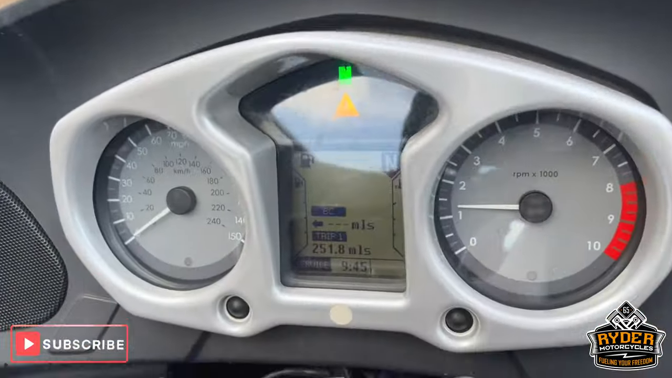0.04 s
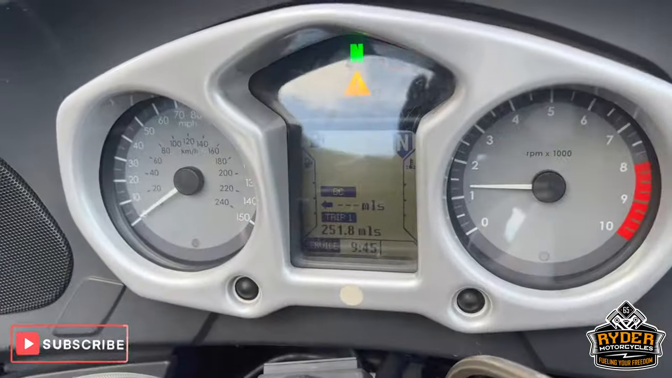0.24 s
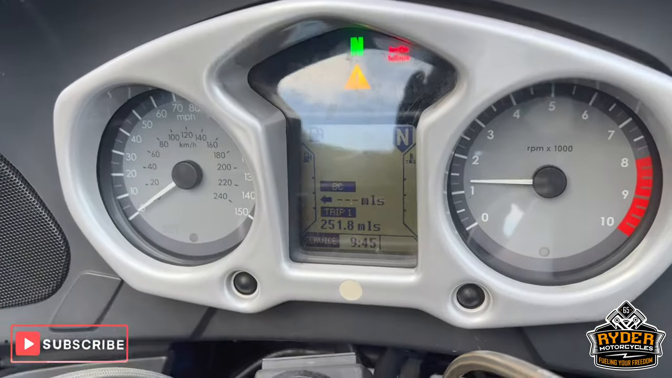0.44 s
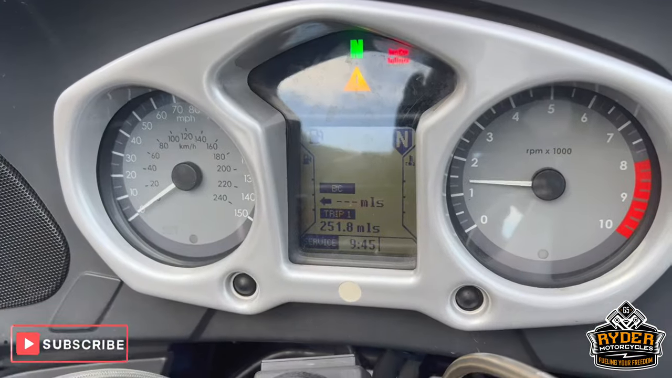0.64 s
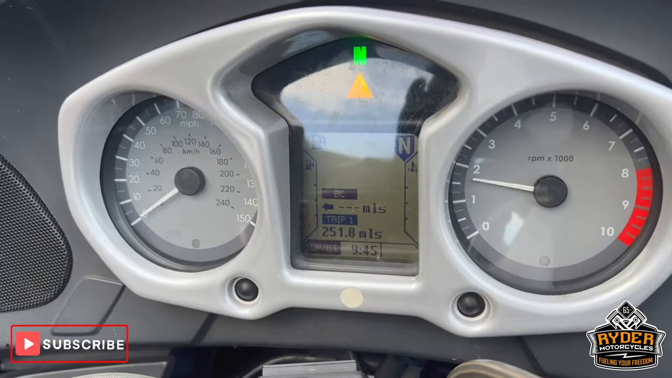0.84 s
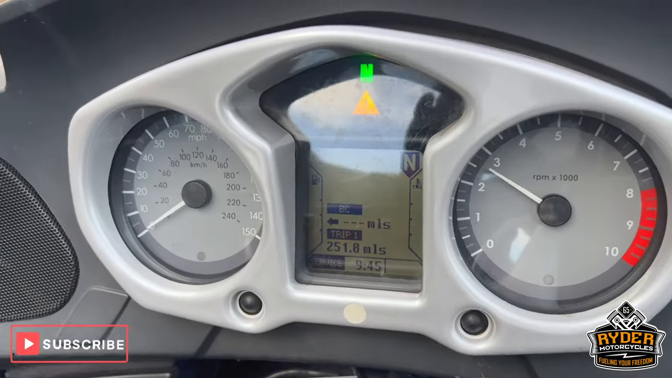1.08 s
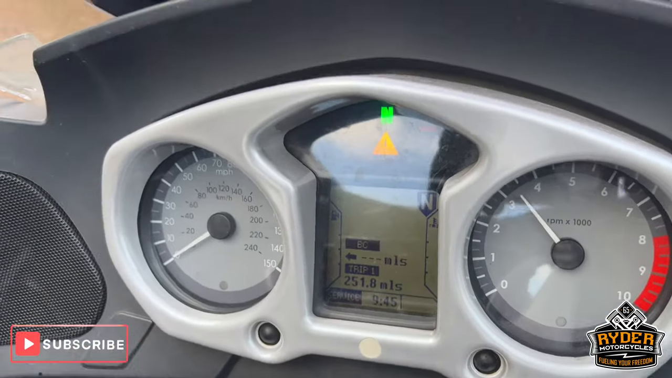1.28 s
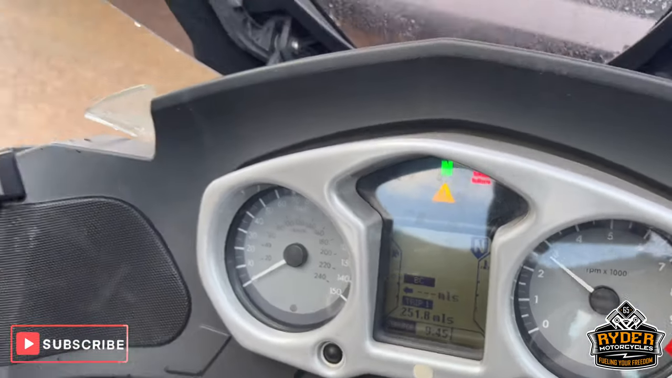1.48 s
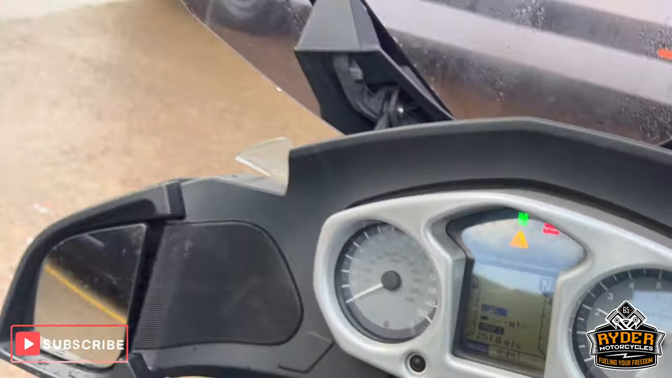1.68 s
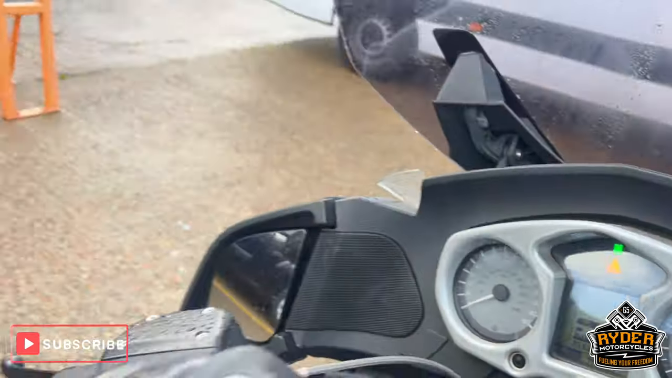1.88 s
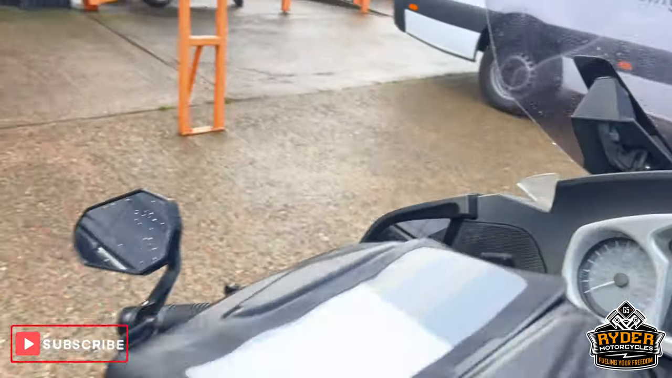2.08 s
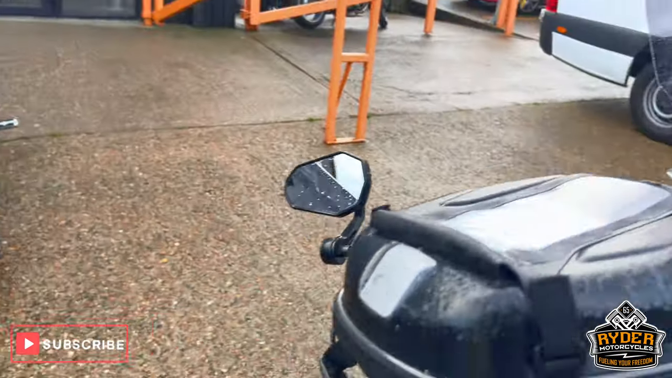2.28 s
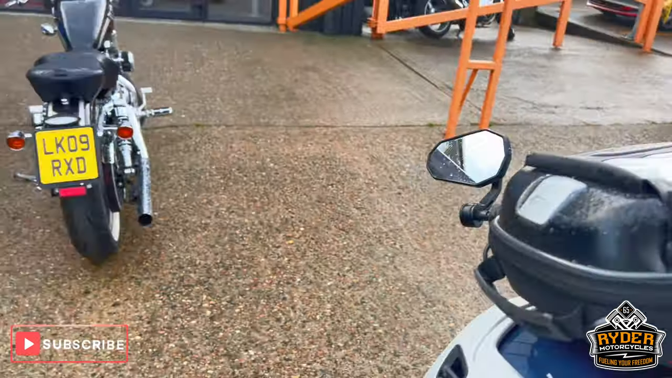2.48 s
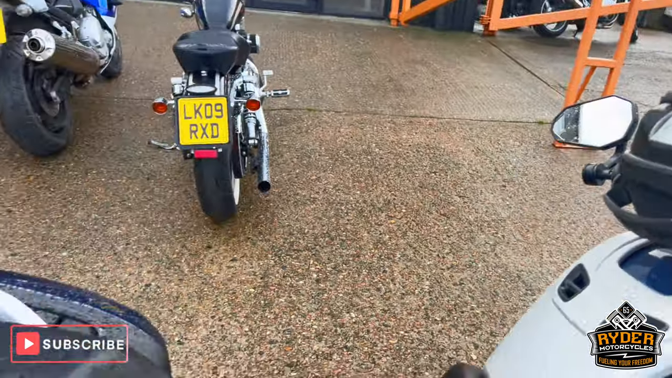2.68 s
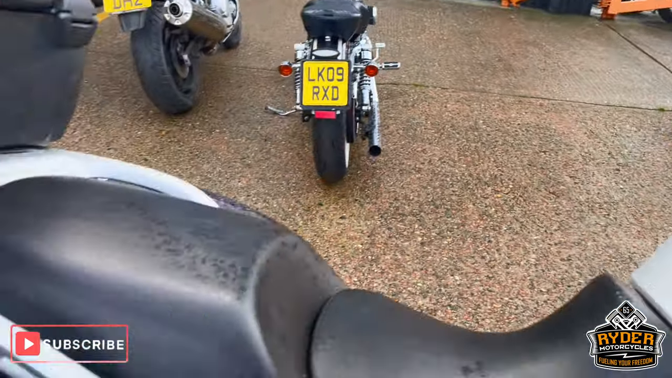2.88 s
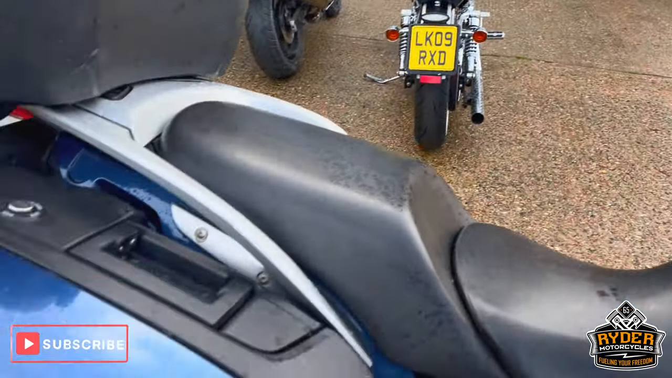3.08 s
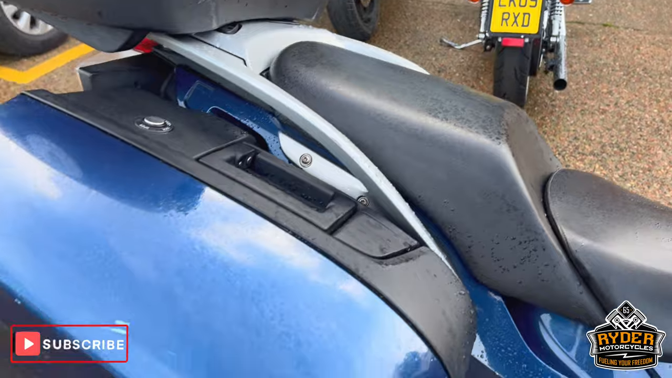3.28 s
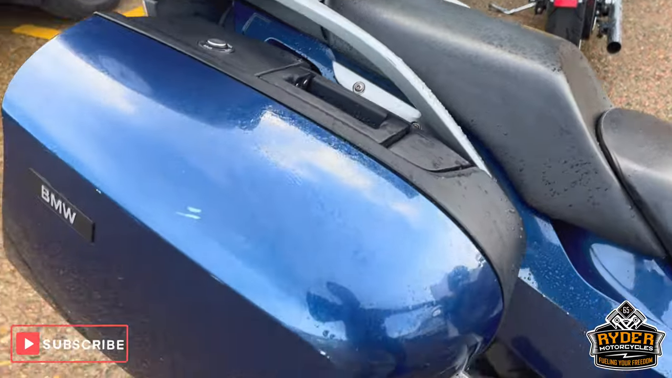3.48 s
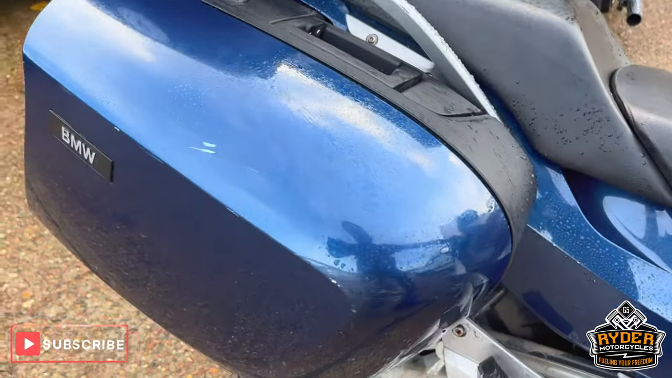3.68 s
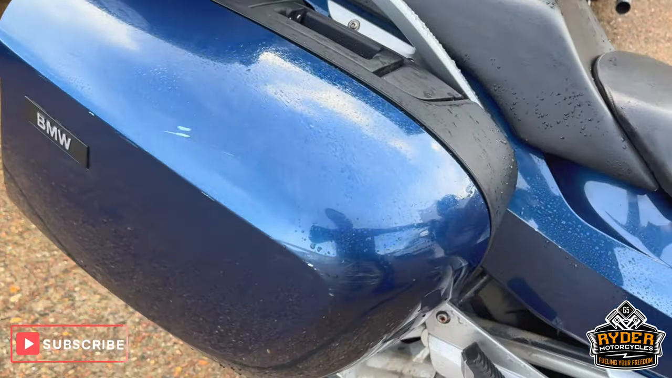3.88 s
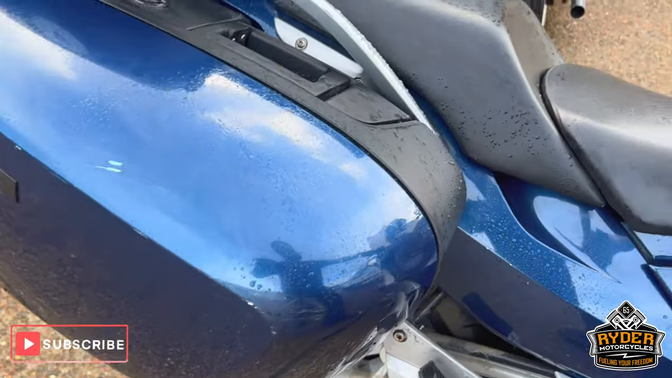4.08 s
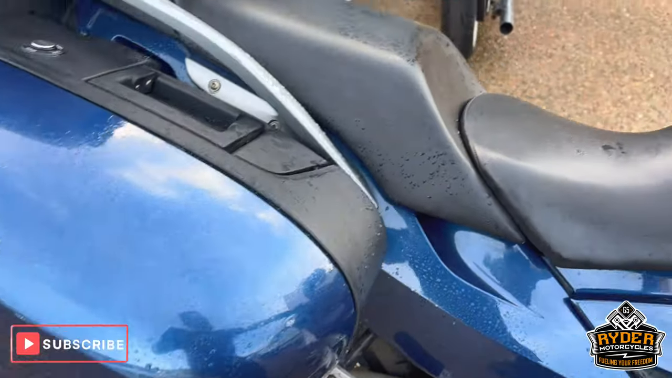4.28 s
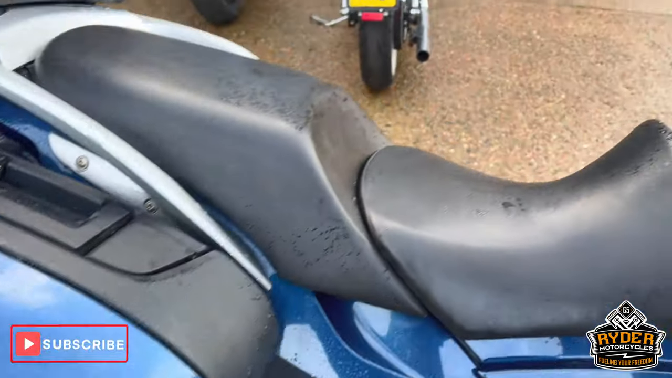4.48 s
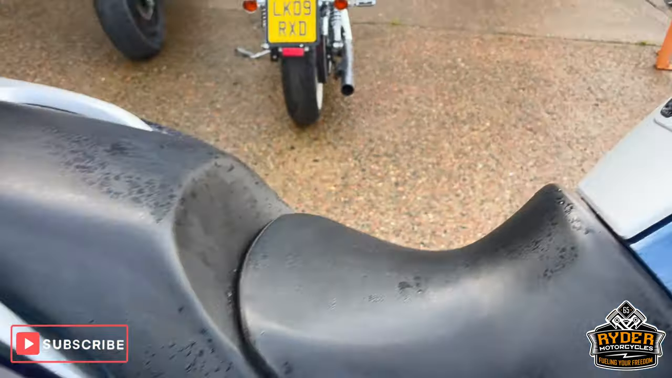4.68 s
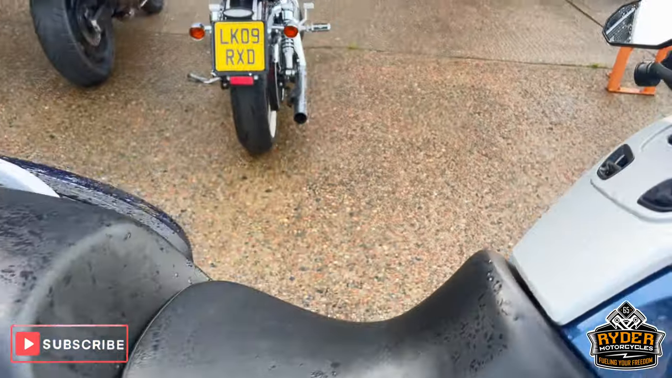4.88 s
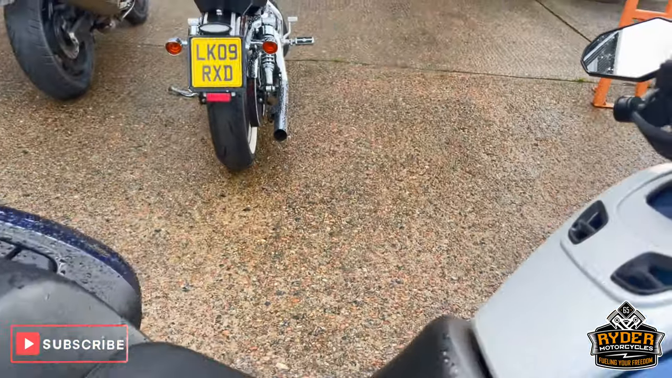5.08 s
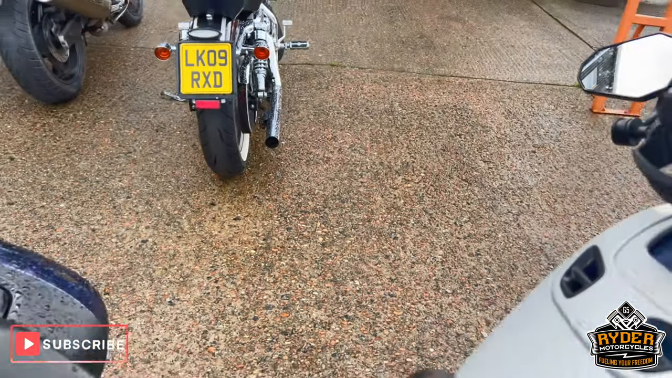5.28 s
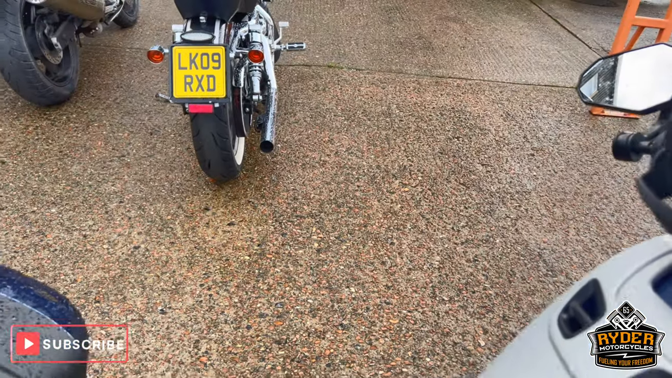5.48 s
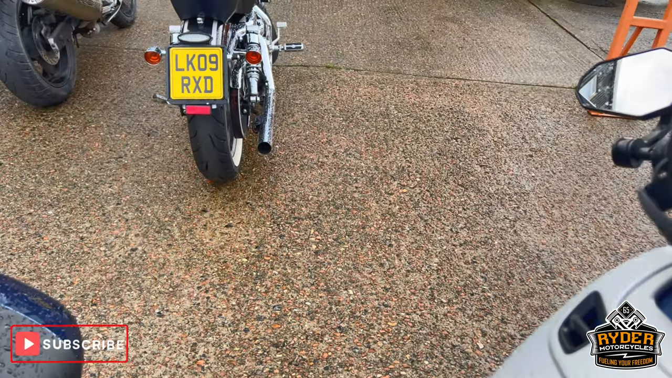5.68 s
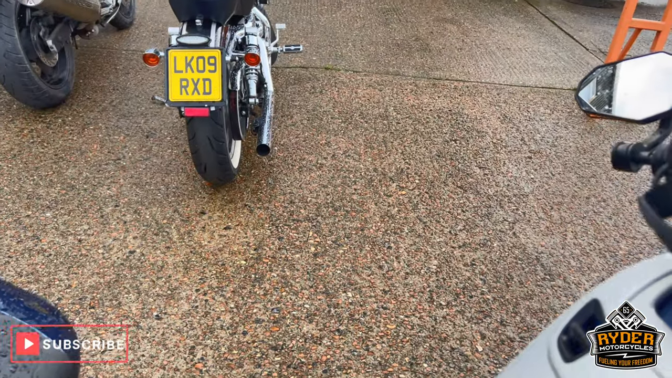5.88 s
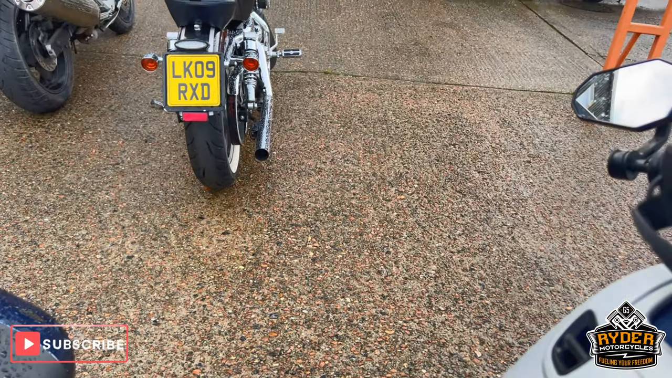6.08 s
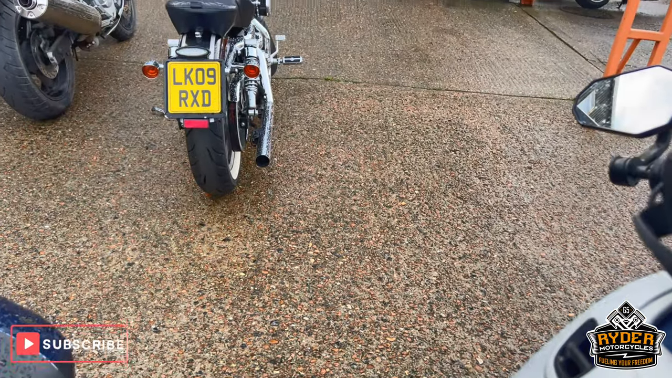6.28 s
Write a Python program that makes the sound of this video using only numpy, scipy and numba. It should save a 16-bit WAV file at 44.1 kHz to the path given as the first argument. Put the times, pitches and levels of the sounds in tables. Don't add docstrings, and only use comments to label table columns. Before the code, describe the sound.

Outdoors on hard ground, a handheld phone stays close to a twin-cylinder motorcycle. Low puttering idle with fine mechanical hiss, a quick throttle blip swelling into a hoarse roar, then a falling whine to idle. Cloth rustles, a pannier latch squeaks faintly, and a second blip climbs higher and throatier before stumbling down. Quiet idle remains over distant hum, with short reflections from parked vehicles.

```python
import sys
import numpy as np
from scipy import signal
from scipy.io import wavfile
from scipy.ndimage import uniform_filter1d
from numba import njit

SR = 44100
rng = np.random.default_rng(int(sys.argv[2]) if len(sys.argv) > 2 else 0)


def digitize_waveform(pressure):
    field = np.atleast_2d(pressure).T
    bounded = np.clip(field, -1, 1)
    quanta = np.round(bounded * 32767).astype(np.int16)
    wavfile.write(sys.argv[1], SR, quanta)


def linear_from_db(decibels):
    return 10 ** (np.asarray(decibels, float) / 20)


N = 279594

# f/Hz, level/dB per Hz
YARD = [(88, -30), (150, 17), (189, -16), (416, -4.5), (505, 21), (1770, 0), (4460, 5), (9090, -105),
        (15000, -72)]
YARD_DB = -60

# start/s, end/s, level/dB
SLEEVE = [
    (1.523, 1.803, -61),
    (1.767, 2.125, -52),
    (2.078, 2.32, -70),
    (2.26, 2.72, -63),
]
# f/Hz, width/Hz, level/dB
SLEEVE_COLOUR = [(4820, 1300, -8), (7370, 3500, -6.5), (10640, 1180, -9.5), (11400, 2500, -10),
                 (12178, 1100, -16), (14200, 3000, -26)]
# t/s, peak level/dB
TICKS = [
    (2.378, -47),
    (6.2442, -55),
]
STROKE_SHAPE = 1.3

# t/s, flank share/0-1, nearness to cylinder head/dB
SWING = [
    (0, 0, -2),
    (1.9, 0.08, 0.2),
    (2.602, 0.63, 1.5),
    (2.85, 0.8, 3),
    (4.6, 1, -0.5),
    (4.9, 0.61, .6),
    (6.34, 0.54, -3.5),
]

# t/s, f/Hz, level/dB, length/s
SQUEAKS = [(2.346, 1900, -67, .022), (2.45, 1900, -64, .02), (2.814, 1830, -61, .013),
           (2.85, 1255, -56, .025), (2.9, 1880, -59, .01), (2.981, 1860, -54, .011), (3.01, 697, -52, .012),
           (3.025, 1260, -58, .04), (3.07, 1870, -64, .012), (3.175, 1260, -52, .013),
           (3.24, 1260, -57, .03), (3.32, 1870, -55, .07), (3.43, 1260, -50, .06), (3.58, 1280, -37, .06),
           (4.523, 1250, -57, .038), (1.75, 4250, -61, .05), (2.78, 5520, -61, .05), (2.86, 5000, -60, .05),
           (3.22, 5600, -60, .11), (4.163, 5050, -42, .02), (4.6, 4800, -60, .12)]
SQUEAK_BLUR_HZ = (90, 320)
# f/Hz, width/Hz, level/dB
SCREEN = [(856, 38, 7), (1124, 56, 10), (1650, 45, -28)]
SCREEN_DB, SCREEN_SETTLE_DB_PER_S, SCREEN_REST_DB = -57, 15, -80.5
# f/Hz, width/Hz, level/dB
PANNIER = [(695.4, 22, 9.5), (1269, 57, 3), (1880, 54, -6.5), (5550, 85, -21)]
PANNIER_DB, PANNIER_DB_PER_HZ, PANNIER_FAR_DB = -58.5, 0.9363, -37
PANNIER_FULL_HZ = 52
# t/s of coming, near, leaving, gone
PANNIER_NEAR_S = [2.5, 2.9, 4.5, 4.8]

# start/s, end/s, start f/Hz, end f/Hz, level/dB
THROTTLE = [
    (.45, 1.0, 1600, 1420, -57),
    (3.19, 3.42, 1150, 880, -52),
]
CAM_TEETH, POLES = 25.0, 63.5
# f/Hz, level/dB
CAM_CASE = [(570, -76), (690, -60), (775, -46), (900, -50), (1020, -39), (1120, -34), (1280, -37),
            (1500, -32)]
# f/Hz, level/dB
POLE_CASE = [(1450, -77), (1560, -62), (1950, -57), (2300, -60), (2600, -70), (4800, -74)]
CAM_PULL_DB, CAM_HIDDEN_DB, CAM_HIDDEN_HZ = -1, -24, 1060
CAM_FLANK_LOW_DB, CAM_FLANK_LOW_HZ = -9, 950
POLE_PULL_DB, POLE_HIDDEN_DB, POLE_HIDDEN_HZ = -3, -20, 1900
POLE_FLANK_DB = 5

# f/Hz, width/Hz, level/dB
VALVE_GEAR = [(3380, 2700, -2), (4100, 800, 4.5), (4650, 1050, 10), (5000, 290, 1.5), (5930, 660, -15),
              (6930, 1750, 3.5), (8910, 1160, 3), (9550, 1800, -2), (11700, 2500, -22), (13900, 3000, -5)]
# f/Hz, width/Hz, level/dB
FLANK_GEAR = [(3650, 5500, -4), (4080, 640, -10.5), (4871, 680, -4), (5420, 340, -7.5), (6020, 2950, 0.5),
              (6840, 810, -8), (8510, 670, -7.5), (9260, 490, -10.5), (11104, 5000, -26),
              (14618, 2500, -38)]
HEAD_TREBLE_HZ, HEAD_TREBLE_DB_PER_HZ = 10500, 0.32

# f/Hz, width/Hz, level/dB
DASH_RASP = [(255.3, 29, -8.5), (301, 62, -2), (331.8, 50.3, 2), (436, 87, -6), (523, 112, -11.5),
             (711, 151, -6.5), (896, 245, -11)]
FLANK_RASP = [(253.6, 66, -11), (317, 51, -7.5), (430.5, 55, 0), (578, 158, -3.5), (670, 114, 0),
              (880, 450, -14)]
DASH_BARK = [(1062, 190, -6), (1390, 330, -2.5), (1970, 350, -7), (2543, 150, -7.5), (3500, 1500, -3.5)]
FLANK_BARK = [(933, 130, -1), (1325, 200, 1.5), (1662, 120, 3.5), (1820, 230, 2), (2230, 600, 0),
              (2880, 150, -11)]
KNOCK_DB, KNOCK_PULL_DB = 21, 4
# start/s, end/s, level/dB
RASP_SWELLS = [
    (0.43, 0.903, 8),
    (2.1, 2.32, 4.5),
    (3.467, 3.705, 1),
    (3.74, 3.825, 3),
    (3.854, 3.925, 3.5),
]

# f/Hz, level/dB
SILENCER = [(80, -9), (95, -18), (113, -19), (137, -11), (160, -22), (182, -26), (205, -28.5), (250, -20),
            (300, -34), (420, -23.5), (600, -68)]
# f/Hz, level/dB
UNEVEN = [(34, -42), (57, -21), (80, -21), (102, -17), (125, -27), (180, -21.5), (300, -45)]

# t/s, firing rate f/Hz
SPEED = [(0, 22.5), (.55, 22.93), (.74, 28.2), (.97, 41.1), (1.165, 62.4), (1.41, 44.3), (1.62, 35),
         (2.17, 22.1), (3.12, 23.47), (3.28, 28.5), (3.51, 42.1), (3.61, 52.35), (3.82, 77.56),
         (4.08, 56.84), (4.29, 41.01), (4.57, 30.4), (4.91, 22.83), (6.34, 23.08)]
FLYWHEEL_S = .07
OPEN_HZ_PER_S = 12
# t/s, gain/Hz, length/s
CATCHES = [
    (1.6, -.8, .08),
    (1.83, 1.1, .1),
    (4.35, 1.3, .05),
]
# firing rate f/Hz, exhaust orders 1, 2, 3 level/dB
PULL_ORDERS = [(22.7, -58, -50.5, -48.5), (27.8, -52, -39.5, -42), (35, -43, -30.5, -37),
               (42.3, -35, -17, -37.5), (53, -33, -27.5, -34), (56.2, -25, -22.5, -28),
               (63, -21, -22.5, -61), (75, -15.5, -38, -22)]
# firing rate f/Hz, exhaust orders 1, 2, 3 level/dB
OVERRUN_ORDERS = [(23, -58, -45.5, -49), (29.3, -51, -42.5, -46), (35, -44, -32.5, -43),
                  (41, -38, -27, -38), (44.8, -30, -30, -35.5), (51.7, -20, -25, -34),
                  (59.2, -21, -22, -31.5), (74, -19, -28.5, -46)]
# firing rate f/Hz, rasp, bark, valve gear level/dB
PULL_NOISE = [(21.5, -57, -61.5, -64), (28.7, -50.5, -53.5, -57.5), (35, -34.5, -48, -49),
              (42.3, -24, -34, -42), (51.8, -18.5, -29.5, -38), (59.5, -14.5, -23.5, -34.5),
              (62.1, -7, -16, -29.5), (74.2, -18, -16.5, -30.5)]
# firing rate f/Hz, rasp, bark, valve gear level/dB
OVERRUN_NOISE = [(22.9, -69.5, -60.5, -65.5), (30.6, -49, -62, -55), (35.4, -39, -53, -50),
                 (43.8, -33.5, -36.5, -42.5), (49.2, -27.5, -29.5, -40.5), (58, -24.5, -26.5, -37),
                 (63.8, -16, -21.5, -34), (69, -18.5, -19.5, -33.5)]
# rasp, bark, valve gear level/dB
FLANK_PULL_DB = [0, 0, -1.5]
FLANK_OVERRUN_DB = [0.3, 0, 3]
# t/s, level/dB, length/s
LUMPS = [(1.168, -15, 0.045), (1.445, -4, 0.013), (1.516, 3, .02), (1.547, -3, 0.0082), (1.624, 7, 0.0089),
         (1.73, 6.5, 0.062), (1.79, -4.5, .025), (2.116, -6.5, 0.046), (3.848, -9.5, 0.017),
         (3.89, -6, .02), (4.1, -3, 0.035), (4.175, -14, .02), (4.225, 2, .015), (4.252, -6, 0.011),
         (4.288, 5.5, 0.018), (4.405, -10, .02), (4.467, 2.5, 0.037), (4.903, -4.5, 0.056)]
LUMP_SHARES = [0.2, 1, 1, 0.54, 0.26, 0.043]


def even(x, span_s=0.34):
    k = int(span_s * SR)
    power = uniform_filter1d(uniform_filter1d(x ** 2, k), k)
    return x / np.sqrt(power + 1e-18)


@njit
def svf(x, hz, width):
    y, b, l = np.empty(len(x)), 0., 0.
    g, k = np.tan(np.pi * hz / SR), width / hz
    for i in range(len(x)):
        v = (b + g * (x[i] - l)) / (1 + g * (g + k))
        b, l, y[i] = 2 * v - b, l + 2 * g * v, k * v
    return y


def body(x, modes, steep=False):
    out = 0
    for k, (hz, width, db) in enumerate(modes):
        ring = svf(x, 1. * hz, 1. * width)
        if steep:
            ring = svf(ring, 1. * hz, 1. * width)
        out = out + (-1) ** k * linear_from_db(db) / np.sqrt(width) * ring
    return out


def walk(rate_hz):
    k = int(SR / rate_hz)
    held = np.repeat(rng.standard_normal(N // k + 1), k)
    return 1.3 * uniform_filter1d(uniform_filter1d(held, k), k)[:N]


def hump(t, start_s, end_s, shape):
    return np.sin(np.pi * np.clip((t - start_s) / (end_s - start_s), 0, 1)) ** shape


def chart(x, rows):
    at, *columns = np.transpose(rows)
    return np.array([np.interp(x, at, c) for c in columns])


def yard():
    hz, db = np.transpose(YARD)
    out = 0
    for f in 180 * 2 ** np.arange(0, 6.4, .5):
        band_db = np.interp(np.log(f), np.log(hz), db) + 2 * walk(2.0)
        out = out + linear_from_db(band_db) * svf(rng.standard_normal(N), f, f / 3)
    out = signal.lfilter(*signal.butter(3, 8000, fs=SR), out)
    return linear_from_db(YARD_DB) * out / np.std(out)


def slap(x):
    for delay_s, db in [(.0047, -27), (.017, -16.5), (.031, -14.5)]:
        lag = int(delay_s * SR)
        x[lag:] += linear_from_db(db) * x[:-lag].copy()
    return x


def sleeve(t):
    gain = sum(linear_from_db(db) * hump(t, start, end, STROKE_SHAPE) for start, end, db in SLEEVE)
    grains = rng.standard_normal(N) * linear_from_db(2.5 * walk(150) + 1.2 * walk(30))
    rustle = gain * even(body(grains, SLEEVE_COLOUR, True), 0.12)
    ticks = np.zeros(N)
    for s, db in TICKS:
        ticks[int(s * SR)] = linear_from_db(db)
    return linear_from_db(1.5) * rustle + 2 * svf(ticks, 9045.0, 9070.0)


def squeaks(t):
    low, high = (.4 + .7 * (walk(blur) + 1j * walk(blur)) for blur in SQUEAK_BLUR_HZ)
    out = 0
    for s, hz, db, length_s in SQUEAKS:
        ragged = high if hz > 3000 else low
        swell = linear_from_db(db) * np.exp(-((t - s) / length_s) ** 2)
        out = out + swell * np.imag(ragged * np.exp(2j * np.pi * hz * t))
    return out * np.sqrt(2)


def buzz(turns, modes, effort_db):
    beat = 2.7 + np.exp(-(turns / 2 % 1) / 0.16)
    fits = 0
    for mode in modes:
        shaking = beat * linear_from_db(3 * walk(17)) * rng.standard_normal(N)
        fits = fits + body(shaking, [mode], True)
    return linear_from_db(effort_db) * even(fits, 0.2)


def panels(t, hz, turns):
    screen_db = np.maximum(SCREEN_DB - SCREEN_SETTLE_DB_PER_S * t, SCREEN_REST_DB)
    far = np.interp(t, PANNIER_NEAR_S, [1, 0, 0, 1])
    above_idle_hz = np.minimum(hz, PANNIER_FULL_HZ) - SPEED[0][1]
    pannier_db = PANNIER_DB + PANNIER_DB_PER_HZ * above_idle_hz * (1 - far) + PANNIER_FAR_DB * far
    return buzz(turns, SCREEN, screen_db) + buzz(turns, PANNIER, pannier_db) + squeaks(t)


def whine(hz, blur_hz):
    angle = 2 * np.pi * np.cumsum(hz) / SR
    rough = (.3 + walk(blur_hz)) * np.sin(angle) + walk(blur_hz) * np.cos(angle)
    return linear_from_db(2 * walk(24.99)) * rough


def throttle_whistle(t):
    rows = np.array(THROTTLE)
    air_hz = np.interp(t, rows[:, :2].ravel(), rows[:, 2:4].ravel())
    gain = sum(linear_from_db(db) * hump(t, start, end, 0.57) for start, end, _, _, db in THROTTLE)
    return gain * whine(air_hz, 330)


def gear_whines(hz, pull, flank):
    cam_hz, pole_hz = CAM_TEETH * hz, POLES * hz
    hidden = np.maximum(2 * np.clip(pull - .5, 0, 1), np.clip((cam_hz - CAM_HIDDEN_HZ) / 100, 0, 1))
    cam_db = chart(cam_hz, CAM_CASE)[0] + CAM_PULL_DB * pull + CAM_HIDDEN_DB * flank * hidden
    cam_db += CAM_FLANK_LOW_DB * flank * np.clip((CAM_FLANK_LOW_HZ - cam_hz) / 150, 0, 1)
    pole_db = chart(pole_hz, POLE_CASE)[0] + POLE_PULL_DB * pull + POLE_FLANK_DB * flank
    pole_db += POLE_HIDDEN_DB * flank * np.clip((POLE_HIDDEN_HZ - pole_hz) / 100, 0, 1)
    return linear_from_db(cam_db) * whine(cam_hz, 150) + linear_from_db(pole_db) * whine(pole_hz, 240)


def valve_gear(turns, hz, flank):
    seat_size = linear_from_db(5.7 * rng.standard_normal(800))
    seat = seat_size[(2 * turns).astype(int)] * np.exp(-(2 * turns % 1) / .5)
    ticks = linear_from_db(3.3 * rng.exponential(size=N)) * (rng.random(N) < .03) * rng.choice([-1, 1], N)
    out = 0
    for dash_mode, flank_mode in zip(VALVE_GEAR, FLANK_GEAR):
        flicker = linear_from_db(2.8 * walk(9.8))
        drive = (0.98 + 0.28 * seat) * flicker * (rng.standard_normal(N) + 0.59 * ticks)
        if dash_mode[0] > HEAD_TREBLE_HZ:
            drive = drive * linear_from_db(HEAD_TREBLE_DB_PER_HZ * (hz - 57))
        out = out + (1 - flank) * body(drive, [dash_mode], True) + flank * body(drive, [flank_mode], True)
    return even(out * (1 + 0.035 * np.cos(np.pi * turns)), 0.41)


def firings(turns, weak_db, scatter_db):
    count = turns.astype(int)
    size = linear_from_db(weak_db * (np.arange(400) % 2) + scatter_db * rng.standard_normal(400))
    return np.diff(count, prepend=count[0]) * size[count], size[count]


def gas(turns, hz, flank, dash_modes, flank_modes, click_db, fall, steady, lag):
    clicks, size = firings(turns + lag, weak_db=-3.5, scatter_db=2.5)
    calm = size ** (22 / hz) ** 2
    puff = calm * (steady + np.exp(-((turns + lag) % 1) / fall)) * rng.standard_normal(N)
    knock = linear_from_db(click_db + .3 * (hz - 22)) * clicks * calm / size
    drive = signal.lfilter(*signal.butter(2, 3000, fs=SR), puff - knock)
    return even((1 - flank) * body(drive, dash_modes) + flank * body(drive, flank_modes))


def thump(turns, hz, low_db):
    angle = 2 * np.pi * turns
    low = sum(sign * linear_from_db(db) * np.cos(k * angle) for k, sign, db in zip([1, 2, 3], [1, -1, -1], low_db))
    upper = 0
    for order in range(4, 22):
        late = .35 * max(order - 4.5, 0) ** 2
        order_db = chart(order * hz, SILENCER)[0] + 2.0 * walk(14.0)
        upper = upper - linear_from_db(order_db) * np.cos(order * angle - late)
    for order in np.arange(1.5, 8):
        order_db = chart(order * hz, UNEVEN)[0] + 3.9 * walk(6.1)
        upper = upper - linear_from_db(order_db) * np.cos(order * angle - 1.2)
    overrun_hz_per_s = uniform_filter1d(np.clip(-np.gradient(hz) * SR, 0, 70), 4000)
    lump = linear_from_db(-26 + 0.14 * overrun_hz_per_s) * (1 + walk(18)) * np.cos(angle / 2)
    strength = np.sqrt(sum(linear_from_db(2 * db) for db in low_db))
    return np.sqrt(2) * (low + strength * (upper + lump)) * linear_from_db(.8 * walk(20))


def crank(hz, start=.3):
    return start + np.cumsum(hz * (1 + .005 * walk(12))) / SR


def levels(t, hz, pull, flank):
    orders = pull * chart(hz, PULL_ORDERS) + (1 - pull) * chart(hz, OVERRUN_ORDERS)
    noise = pull * (chart(hz, PULL_NOISE) + np.outer(FLANK_PULL_DB, flank))
    noise = noise + (1 - pull) * (chart(hz, OVERRUN_NOISE) + np.outer(FLANK_OVERRUN_DB, flank))
    noise[0] += sum(db * hump(t, start, end, 1) for start, end, db in RASP_SWELLS)
    lumps = sum(db * np.exp(-((t - s) / length_s) ** 2) for s, db, length_s in LUMPS)
    return np.vstack([orders, noise]) + np.outer(LUMP_SHARES, lumps)


def scene():
    t = np.arange(N) / SR
    hz = uniform_filter1d(np.interp(t, *np.transpose(SPEED)), int(FLYWHEEL_S * SR))
    pull = np.clip(.5 + np.gradient(hz) * SR / OPEN_HZ_PER_S / 2, 0, 1)
    hz = hz + sum(gain * np.exp(-((t - s) / length_s) ** 2) for s, gain, length_s in CATCHES)
    turns = crank(hz)
    flank, near_db = chart(t, SWING)
    flank = np.clip(flank, 0, 1)
    *low_db, rasp_db, bark_db, gear_db = levels(t, hz, pull, flank)

    bright = panels(t, hz, turns) + throttle_whistle(t) + gear_whines(hz, pull, flank)
    bright = bright + linear_from_db(gear_db + near_db) * valve_gear(turns, hz, flank)
    knock_db = KNOCK_DB + KNOCK_PULL_DB * pull * flank
    rasp = gas(turns, hz, flank, DASH_RASP, FLANK_RASP, click_db=knock_db, fall=.6, steady=.8, lag=.05)
    bark = gas(turns, hz, flank, DASH_BARK, FLANK_BARK, click_db=-6.5, fall=1.0, steady=1.0, lag=0.31)
    bright = slap(bright + linear_from_db(rasp_db) * rasp + linear_from_db(bark_db - 5.5) * bark)
    return (yard() + sleeve(t) + linear_from_db(-0.05) * bright + thump(turns, hz, low_db))[None]


def roll_off(x):
    return signal.sosfilt(signal.butter(12, 15640, fs=SR, output="sos"), x)


def record(dry):
    mix = np.tanh(1.288 * dry) / 1.234
    return roll_off(mix)


dry = scene()
out = record(dry)
digitize_waveform(out)
```